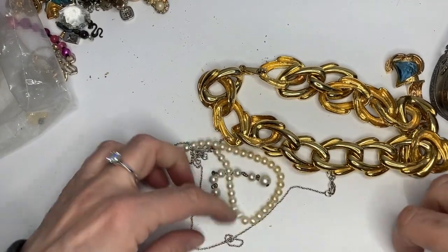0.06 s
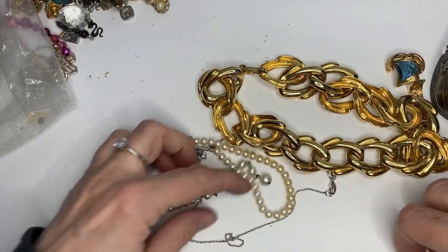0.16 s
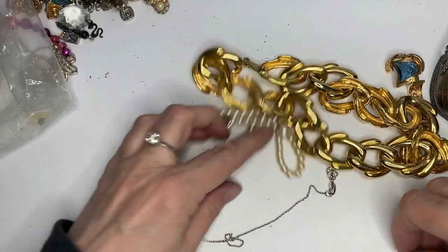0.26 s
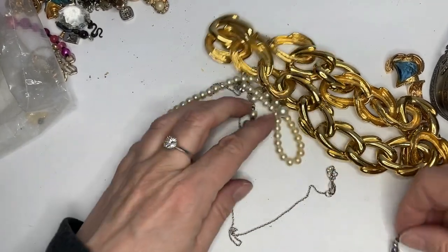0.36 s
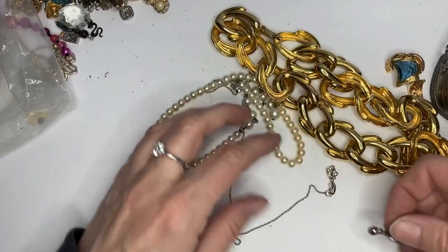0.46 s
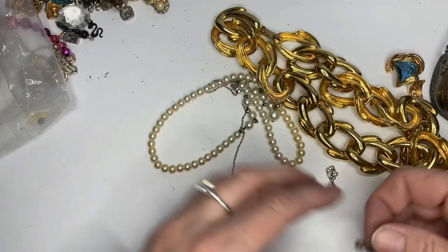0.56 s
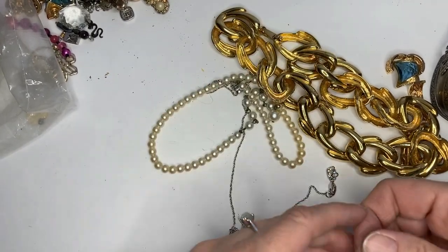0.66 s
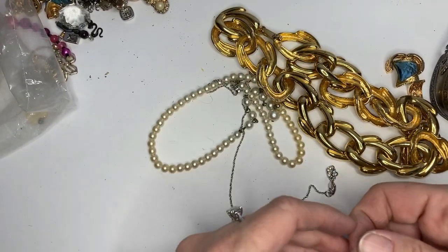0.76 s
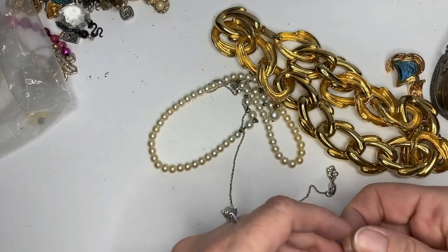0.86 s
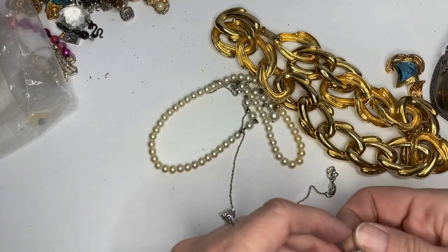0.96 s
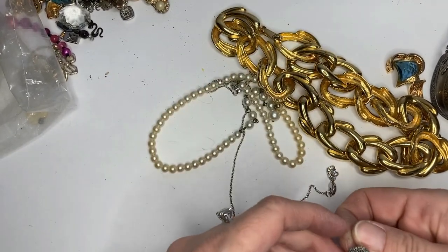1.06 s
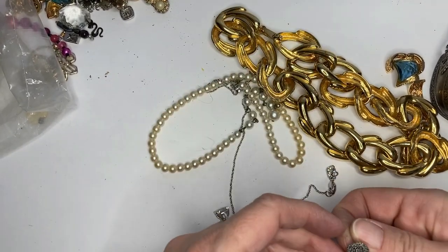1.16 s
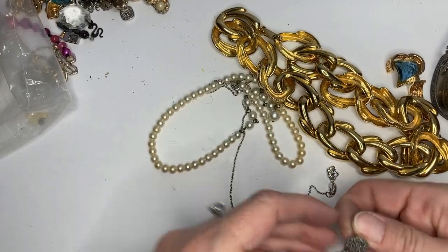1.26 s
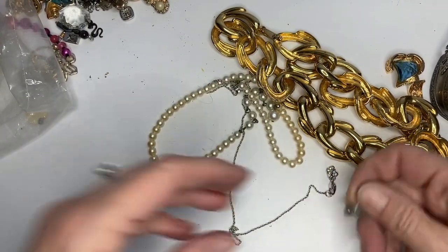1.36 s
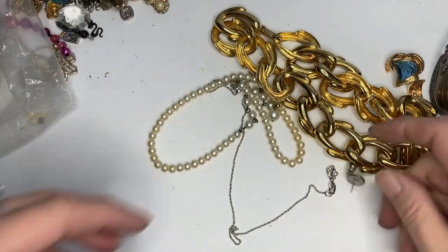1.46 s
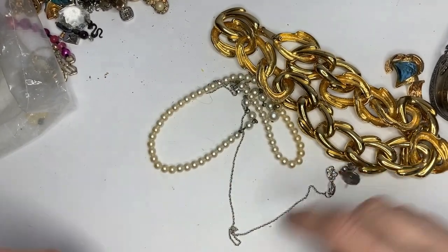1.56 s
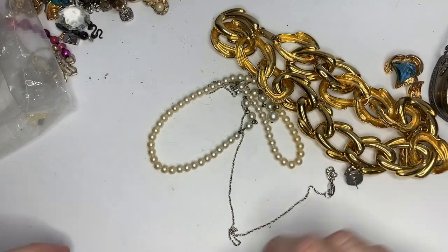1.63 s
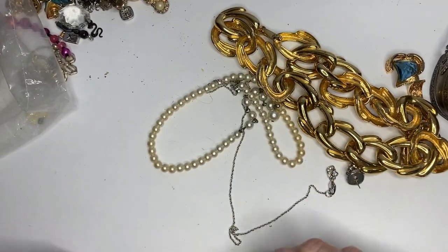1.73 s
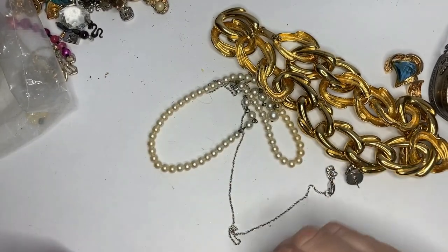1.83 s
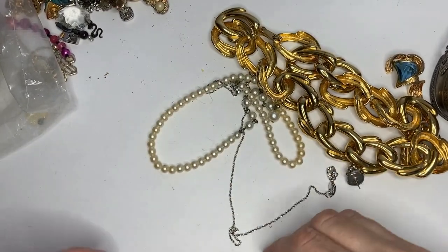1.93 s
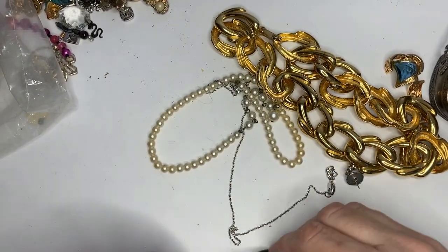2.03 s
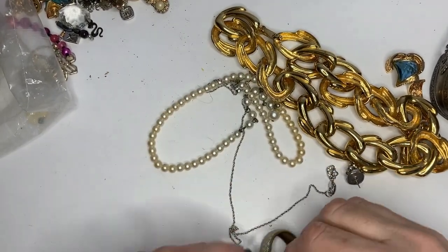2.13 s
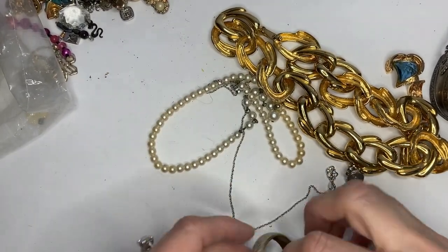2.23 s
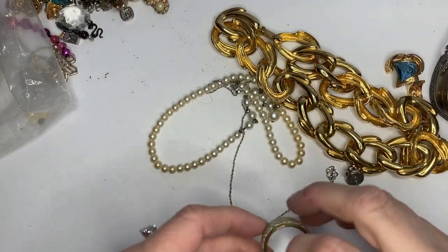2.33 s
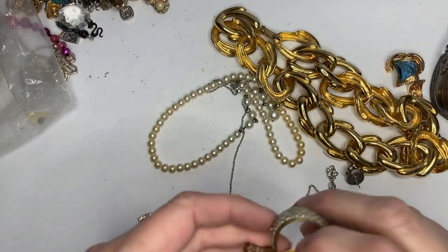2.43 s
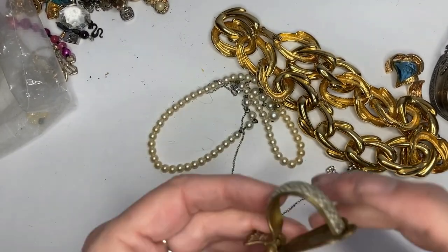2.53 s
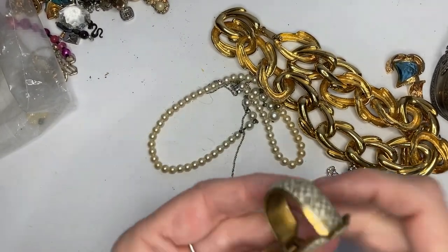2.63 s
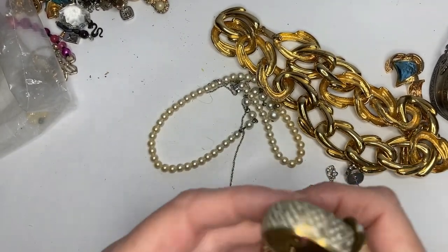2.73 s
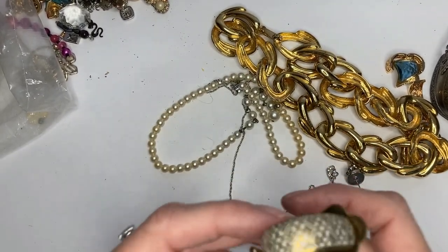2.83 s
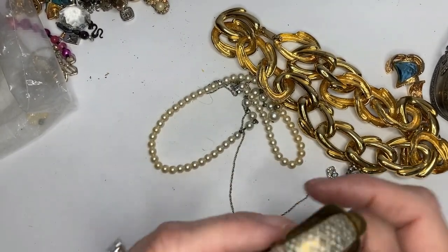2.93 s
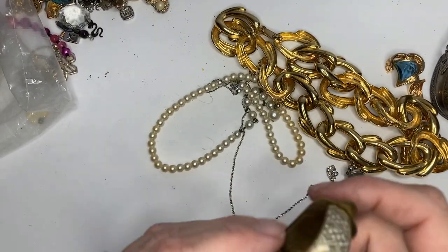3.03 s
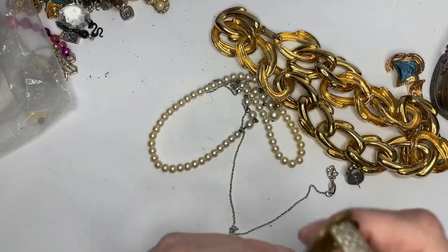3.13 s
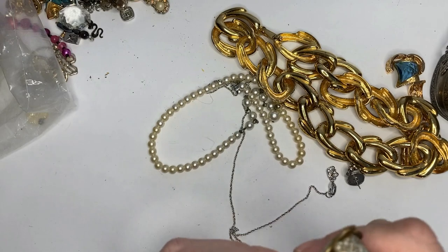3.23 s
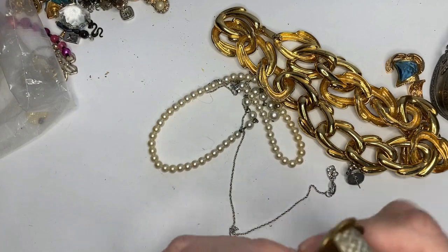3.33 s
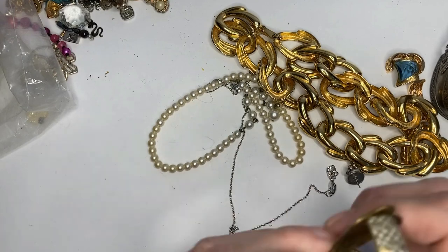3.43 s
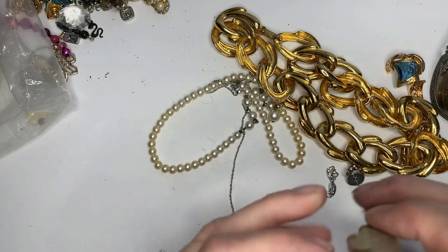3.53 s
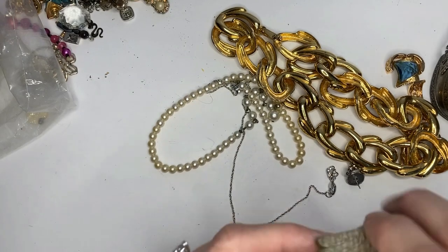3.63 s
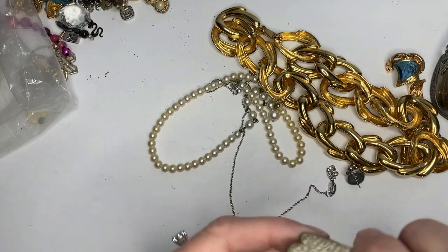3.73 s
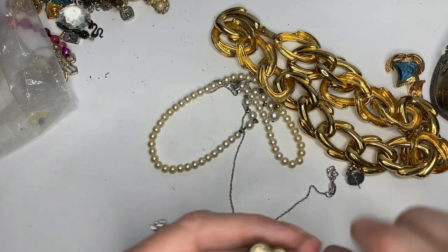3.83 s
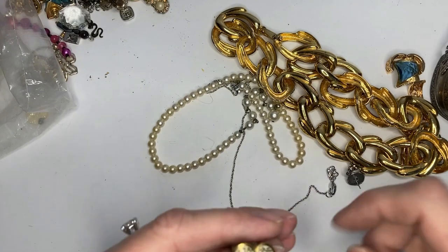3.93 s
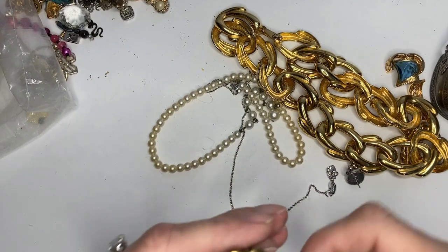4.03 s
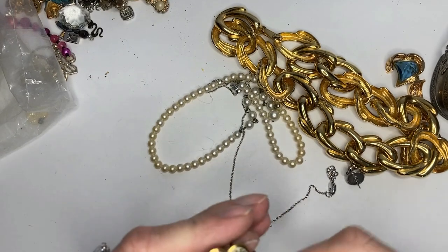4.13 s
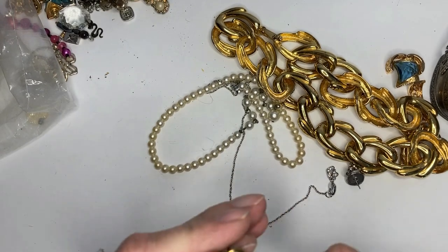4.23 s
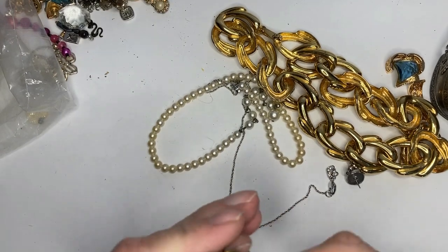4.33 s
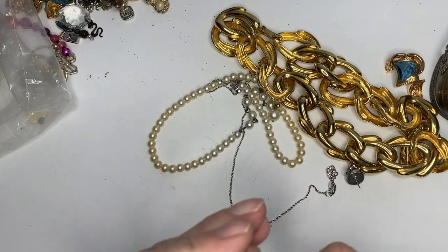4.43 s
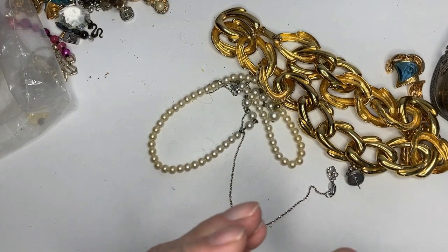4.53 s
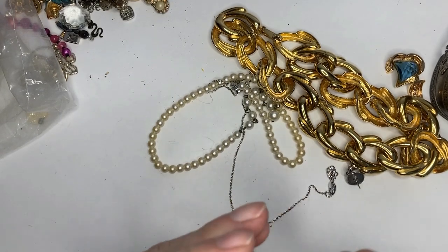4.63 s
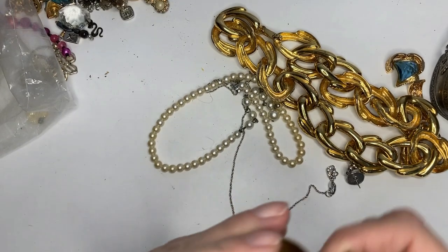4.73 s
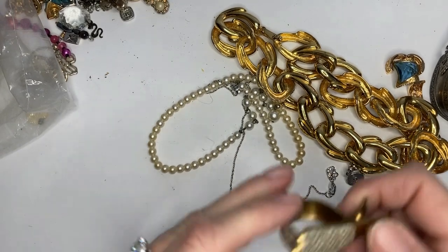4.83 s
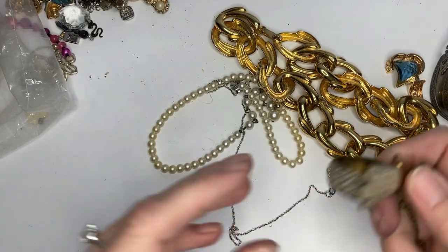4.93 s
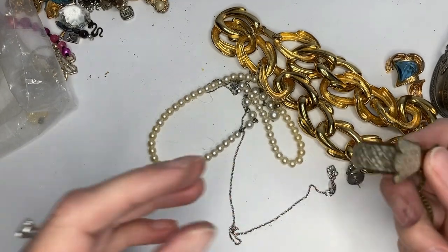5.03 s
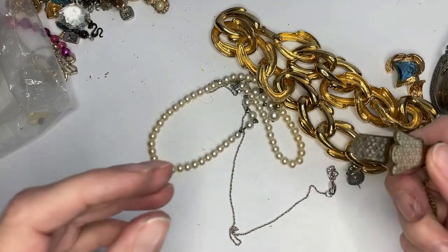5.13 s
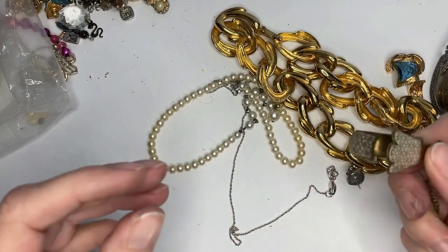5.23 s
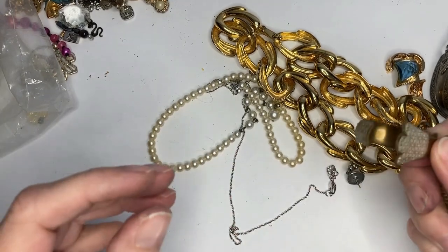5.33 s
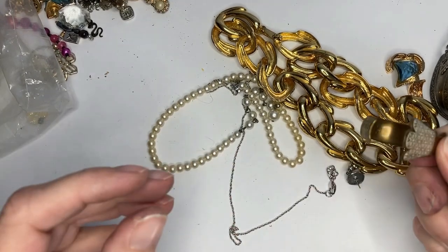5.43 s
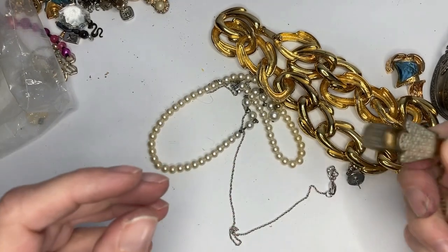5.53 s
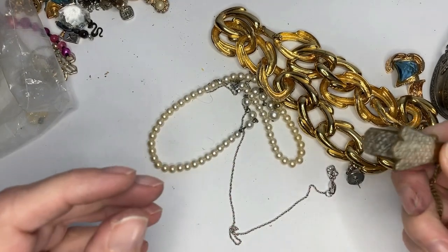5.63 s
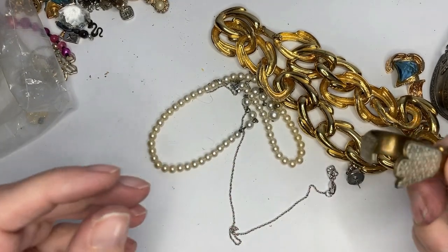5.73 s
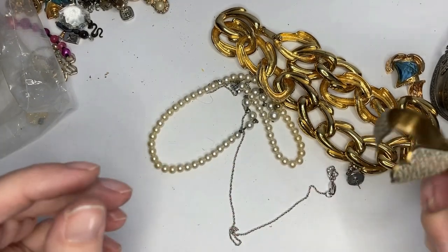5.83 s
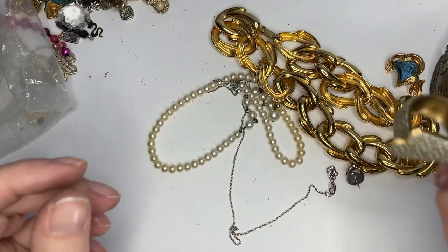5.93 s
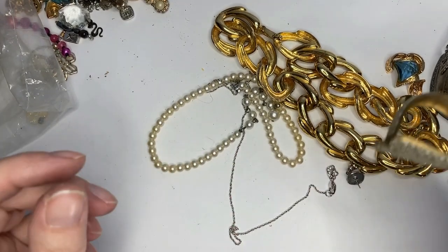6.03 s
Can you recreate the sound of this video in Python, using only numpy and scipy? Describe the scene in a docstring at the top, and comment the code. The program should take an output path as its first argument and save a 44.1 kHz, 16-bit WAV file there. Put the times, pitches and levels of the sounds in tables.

```python
"""Jewellery is sorted by hand on a table, close to a pair of microphone ports.
First pearls and a heavy chain are pushed aside: random tiny hits make the scrape and set the links ringing.
Then a small charm drops in dry ticks and thuds, and a metal bracelet is picked up with ringing knocks.
Its hinge ticks and grinds in short damped rings, and at last its clasp snaps shut.
Throughout, a motor in the building throbs as a sum of drifting overtones, over soft noise of the air."""
import sys
import numpy as np
from scipy import signal
from scipy.fft import rfft, irfft, next_fast_len
from scipy.io import wavfile
from scipy.ndimage import map_coordinates

SR = 44100
rng = np.random.default_rng(int(sys.argv[2]) if len(sys.argv) > 2 else 0)


def transcribe(u):
    """Save the signal u as a 16-bit wav file named by the first command-line argument.

    u: samples, shape (n,) or (channels, n), limited to [-1, 1]; the rate is SR.
    q: integer samples, one column per channel.
    """
    v = np.clip(np.atleast_2d(u).T, -1, 1)
    q = np.round(v * 32767).astype(np.int16)
    wavfile.write(sys.argv[1], SR, q)


N = 267863
TIME = np.arange(N) / SR  # s, the whole scene
AGE = np.arange(SR // 4) / SR  # s, since one hit began

# how a chain link rings: f/Hz, relative level/dB, time to fall by 60 dB (t60)/s
LINK = [(4515, -8.5, .06), (8143, -14, .03), (8659, -9, .08), (10082, -8, .09), (10859, -6, .085),
        (11968, -2, .04), (13201, -2, .07), (14592, -12, .09), (14859, -7, .06)]
# tone colour of small hard contacts: f/Hz, relative level/dB
TICK = [(300, -45.5), (1500, -15.5), (2900, -23.5), (4300, 0), (5400, -13), (8000, -6), (10000, -4),
        (12000, -11), (14000, -13.5), (16500, -9.5)]
# how fast a movement dies away when the hand stops
SETTLE_DB_PER_S = 618


def amp(db):
    """Turn decibels into a gain."""
    return 10 ** (np.asarray(db) / 20)


def unit(x):
    """Scale to an average strength (rms) of 1."""
    return x / np.sqrt(np.mean(x ** 2) + 1e-20)


def along(points, hz):
    """Read a curve of (Hz, value) points on a logarithmic pitch axis."""
    f, v = np.transpose(points)
    return np.interp(np.log(hz + 1), np.log(f + 1), v)


def wobble(rate):
    """Draw a smooth random curve with this many knots a second."""
    return map_coordinates(rng.standard_normal(400), [TIME * rate + 2], mode="mirror")


def filtered(x, response):
    """Change the strength or phase of each frequency in x."""
    m = next_fast_len(N + SR // 2)
    spectrum = rfft(x, m) * response(np.fft.rfftfreq(m, 1 / SR))
    return irfft(spectrum, m)[..., :N]


def coloured(x, spectrum):
    """Give x a tone colour; white input keeps its power."""
    return filtered(x, lambda hz: unit(amp(along(spectrum, hz))))


def add(track, s, sound):
    """Mix a sound into a track at time s."""
    part = track[max(round(s * SR), 0):][:len(sound)]
    part += sound[:len(part)]


def dying(t60):
    """Fade steadily, by 60 dB in t60 seconds."""
    return amp(-60 * AGE / max(t60, .001))


def blow(sound):
    """Scale a hit to rms 1 over its first two milliseconds."""
    return sound / np.sqrt(np.mean(sound[:SR // 500] ** 2) + 1e-20)


def contacts(rate, spread_db):
    """Scatter tiny impacts of uneven size at random, about rate a second, rms 1."""
    happens = rng.random(N) < rate / SR
    signs = rng.choice([-1, 1], N)
    sizes = amp(spread_db * np.clip(rng.standard_normal(N), -2, 2))
    return unit(happens * signs * sizes)


def strike(modes, crack_db, crack_t60, detune=0, rise_s=.0002):
    """Make one blow: every mode rings at a new strength, over the crack of the contact."""
    strengths = amp(2.5 * rng.standard_normal(len(modes)))
    pitches = np.exp(detune * rng.standard_normal(len(modes)))
    ring = np.zeros(len(AGE))
    for strength, pitch, (hz, db, t60) in zip(strengths, pitches, modes):
        tone = np.sin(2 * np.pi * (pitch * hz * AGE + rng.random()))
        ring += strength * amp(db) * dying(t60) * tone
    # subtracting nearby samples thins the bass of the noise
    crack = np.convolve(rng.standard_normal(len(AGE)), [1, 0, -1], "same") * dying(crack_t60)
    rise = 1 - np.exp(-AGE / rise_s)
    return blow(rise * (blow(ring) + amp(crack_db) * blow(crack)))


def rattle(modes, gain, rate, detune, count=12):
    """Ring many like pieces, each a little off in its pitches and struck at its own moments."""
    out = np.zeros(N)
    moving = np.flatnonzero(gain > gain.max() / 1000)
    span = slice(moving[0], moving[-1] + 1)
    for _ in range(count):
        ring = np.zeros(len(AGE))
        for hz, db, t60 in modes:
            piece_hz = hz * np.exp(detune * rng.normal())
            ring += amp(db) * dying(t60) * np.sin(2 * np.pi * (piece_hz * AGE + rng.random()))
        hits = gain * contacts(rate / count, spread_db=4)
        ringing = signal.oaconvolve(hits[span], ring / np.linalg.norm(ring))
        add(out, span.start / SR, ringing)
    return out / np.sqrt(count)


def stroke(start, length, fade_db_per_s, release_db_per_s):
    """Shape one movement: a quick rise up to its start, a steady fade or growth, then the release."""
    attack_s = 0.0036
    age = np.maximum(TIME - start, 0)
    rise = np.clip((TIME - start) / attack_s + 1, 0, 1) ** 2
    fade_db = -fade_db_per_s * np.minimum(age, length)
    release_db = -release_db_per_s * np.maximum(age - length, 0)
    return rise * amp(fade_db + release_db)


def swells(rows):
    """Shape soft movements that come and go smoothly."""
    return sum(amp(db) * np.exp(-((TIME - s) / half) ** 2) for s, half, db in rows)


def low_cut(x, cut_hz):
    """Weaken the bass: a body radiates little below its lowest mode."""
    return signal.sosfilt(signal.butter(4, cut_hz, "high", fs=SR, output="sos"), x)


def chain():
    """Heavy links jostle and clink, over the clatter of pearls and the thin ring of light links."""
    # the chain is shoved: start t/s, length/s, relative level/dB
    shoves = [(0.023, 0.25, -41.5), (0.264, 0.071, -28), (0.309, 0.095, -22), (0.434, 0.0091, -27)]
    # link strikes link: t/s, relative level/dB
    clinks = [(.251, -18), (0.276, -12.5), (0.3137, -0.5), (.319, -3), (0.3482, -14.5), (.366, -11),
              (.387, -9), (.404, -8.5), (.413, -18.5), (.441, -18)]
    # thin ringing of the light links: f/Hz, relative level/dB, t60/s
    light_links = [(2750, -19, .2), (3430, -7.5, 0.24), (3810, 4, 0.19), (4231, -15.5, .2)]
    fade_db_per_s = 47.5
    strokes = [amp(db) * stroke(s, length, fade_db_per_s, SETTLE_DB_PER_S) for s, length, db in shoves]
    jostle = np.max(strokes, axis=0)
    links = rattle(LINK, jostle, rate=190, detune=.025)
    pearls = coloured(jostle * contacts(rate=350, spread_db=5), TICK)
    thin = np.zeros(N)
    for hz, db, t60 in light_links:
        thin += amp(db) * rattle([(hz, 0, t60)], jostle, rate=80, detune=.003, count=1)
    out = amp(1.5) * links + amp(-16.0) * pearls + amp(-23) * thin
    for s, db in clinks:
        clink = strike(LINK, crack_db=-7, crack_t60=.025, detune=.002)
        add(out, s, amp(db - 10.0) * clink)
    return out


def sliding():
    """Beads and links catch and skip over the grain of the table, which drums beneath them."""
    # pieces are pushed over the table: start t/s, length/s, relative scrape level/dB,
    # scrape fade/(dB per s; negative grows), relative drumming level/dB
    pushes = [(0.008, 0.37, -56, -17.5, -49.5), (0.122, 0.036, -46.5, 43, -43.5),
              (0.241, 0.2, -38.5, 61.5, -37.5), (0.542, 0.012, -57.5, 29, -63), (1.469, 0.43, -55, 43, -64),
              (1.748, 0.32, -43, 39, -44), (2.14, 0.14, -55.5, 31, -67.5), (2.367, 0.18, -54, -13, -60)]
    # fingertips brush over beads and metal: middle t/s, half length/s, relative level/dB
    brushes = [(.67, 0.11, -71.5), (1.46, 0.071, -74.5), (2.69, 0.15, -69.5), (3.17, 0.069, -78),
               (5.04, 0.2, -80.5)]
    # tone colour of the scrape: f/Hz, relative level/dB
    scrape_colour = [(200, -32.5), (700, 0), (1500, -3), (2700, -8.5), (3900, 2), (5200, -10.5),
                     (7000, 1.5), (10000, 1), (13000, -7.5), (16000, -5.5)]
    # tone colour of the drumming table: f/Hz, relative level/dB
    table_colour = [(60, -16), (150, -3.5), (300, 1.5), (480, -4), (600, -10.5), (900, -15.5), (1500, -33),
                    (3000, -33)]
    release_db_per_s, drum_fade_db_per_s = 205.5, 18.5
    handling_db = -85.5  # relative level: the hands are never quite still
    rub = swells(brushes) + amp(handling_db)
    weight = np.zeros(N)
    for s, length, scrape_db, fade, drum_db in pushes:
        rub = np.maximum(rub, amp(scrape_db) * stroke(s, length, fade, release_db_per_s))
        press = amp(drum_db) * stroke(s, length, drum_fade_db_per_s, SETTLE_DB_PER_S)
        weight = np.maximum(weight, press)
    catching = amp(3 * wobble(60))
    scrape = rub * unit(catching * contacts(rate=2000, spread_db=5))
    drum = weight * contacts(rate=400, spread_db=4.5)
    return amp(7.5) * coloured(scrape, scrape_colour) + amp(0.5) * coloured(drum, table_colour)


def ticks():
    """Small hard parts meet with a crack, bounce once and hardly ring."""
    # dry contacts of chain, charm, beads and bracelet, including the crack of the chain's
    # hardest clink: t/s, relative level/dB
    taps = [(0.014, -26.5), (0.034, -25.5), (0.314, -5), (0.553, -25.5), (1.471, -23), (1.4773, -10.5),
            (1.4875, -9.5), (1.4886, -14.5), (1.5162, -11), (1.531, -22), (1.723, -29.5), (1.758, -16.5),
            (1.773, -21), (1.7946, -13.5), (1.895, -25.5), (1.972, -21.5), (2.2098, -15), (2.373, -27),
            (2.415, -17.5), (2.422, -20), (5.984, -32)]
    t60_s, bounce_s, bounce_db = 0.011, 0.0077, -22
    out = np.zeros(N)
    for s, db in taps:
        for delay, softer_db in [(0, 0), (bounce_s, bounce_db)]:
            crack = blow(rng.standard_normal(len(AGE)) * dying(t60_s))
            add(out, s + delay, amp(db + softer_db - 8) * crack)
    return coloured(out, TICK)


def thuds():
    """A blow wakes a cluster of damped table modes, briefer when higher; low blows make the board boom."""
    # blows on the table: t/s, relative level/dB, f/Hz
    knocks = [(.32, -24, 350), (0.355, -26.5, 440), (.369, -30, 650), (0.449, -37, 338),
              (1.4905, -21, 1650), (1.4915, -26, 887), (1.492, -25, 438), (1.757, -28, 180.6),
              (1.82, -29, 206), (1.858, -31, 252), (1.917, -33, 930), (1.923, -25.5, 197),
              (1.949, -28, 435), (2.004, -23.5, 260), (2.387, -40, 1084)]
    # the table board booms: f/Hz, relative level/dB, t60/s
    board = [(172, -5, .09), (281.6, 3.5, 0.13), (409.7, -9.5, 0.046)]
    spread_octaves, t60_at_400_hz_s, rise_cycles = .6, 0.02, 1
    # the boom builds up slowly, and mostly in modes near the pitch of the blow
    board_rise_s, board_reach_octaves = .004, .45
    out = np.zeros(N)
    octaves = spread_octaves * np.linspace(-1, 1, 9)
    weights = np.cos(octaves * np.pi / 2)
    for s, db, hz in knocks:
        pitches = hz * 2 ** (octaves + .08 * rng.standard_normal(len(octaves)))
        rings = [np.sin(2 * np.pi * f * AGE) * dying(t60_at_400_hz_s * (400 / f) ** .7) for f in pitches]
        knock = (weights * rng.choice([-1, 1], len(octaves))) @ np.array(rings)
        knock *= 1 - np.exp(-AGE * hz / rise_cycles)
        boom = np.zeros(len(AGE))
        for f, level, t60 in board:
            nearness = np.exp(-(np.log2(f / hz) / board_reach_octaves) ** 2)
            boom += amp(level) * nearness * np.sin(2 * np.pi * f * AGE) * dying(t60)
        boom *= 1 - np.exp(-AGE / board_rise_s)
        add(out, s, amp(db + 4.0) * (knock / np.abs(knock).max() + boom))
    return out


def bracelet():
    """The lifted shell knocks on links, each contact waking some modes most; its dragged rim chatters."""
    # the shell knocks: t/s, relative level/dB, centre f/Hz of the modes that the contact wakes
    clanks = [(1.8142, -7.5, 7300), (1.915, -17, 14000), (1.9195, -14.5, 9600), (2.0122, -19.5, 13000),
              (2.0159, -14, 12100)]
    # how the shell rings before that choice of modes: f/Hz, relative level/dB, t60/s
    shell_modes = [(4285, -12, .1), (4597, -5, .09), (5620, -2, .11), (5879, -1, .07), (6438, -2, .1),
                   (7066, -2, .1), (7790, -10, .07), (8895, -7, .05), (9134, -2, .11), (10648, -4, .06),
                   (10888, 1, .07), (11320, -6, .07), (13180, -3, .055), (14145, -6, .08)]
    # the rim is dragged: middle t/s, half length/s (its sign does not matter), level/dB
    drags = [(2.423, -0.02, -40)]
    # how the rim rings: f/Hz, relative level/dB, t60/s
    rim = [(3410, -7, 0.025), (4000, 1, 0.019)]
    focus_db = 13.5  # modes are this much weaker for each octave from the centre
    rebound_s, rebound_db = 0.0058, -7  # a second contact follows at once
    crack_db, crack_t60_s = -5, .025
    struck_link_db = -9.5  # the link that the shell meets rings too
    out = np.zeros(N)
    for s, db, centre_hz in clanks:
        modes = [(hz, level - focus_db * abs(np.log2(hz / centre_hz)), t60) for hz, level, t60 in shell_modes]
        for delay, softer_db in [(0, 0), (rebound_s, rebound_db)]:
            shell = strike(modes, crack_db, crack_t60_s)
            link = strike(LINK, crack_db, crack_t60_s, detune=.07)
            add(out, s + delay, amp(db + softer_db - 5) * (shell + amp(struck_link_db) * link))
    return out + rattle(rim, swells(drags), rate=350, detune=.06, count=6)


def hinge():
    """Damped by the hand, the hinge ticks and grinds; each catch rings one part more and slips again."""
    # the hinge catches and lets go: t/s, relative level/dB, f/Hz of the part that catches
    catches = [(2.6592, -33.5, 13400), (2.818, -35, 13900), (2.8347, -26, 3920), (2.935, -40, 8800),
               (2.959, -31.5, 4020), (3.1048, -38.5, 14000), (3.405, -41, 5190), (3.561, -30.5, 14700),
               (3.7893, -27, 4170), (3.8103, -29, 4400), (3.8394, -32.5, 9050), (3.881, -32, 8700),
               (3.93, -26, 8970), (4.0567, -20.5, 7700), (4.1938, -31, 10060), (4.224, -39, 14000),
               (4.2764, -26, 5480), (4.389, -26, 14300), (4.468, -35, 9400)]
    # the hinge grinds: middle t/s, half length/s, level/dB before the bass is cut
    grinds = [(3.577, 0.049, -52), (3.763, 0.054, -52.5), (3.87, 0.038, -51.5), (4.088, 0.023, -48),
              (4.333, 0.097, -60.5), (4.386, 0.013, -41.5), (4.538, 0.018, -58)]
    # how the hinge rings: f/Hz, relative level/dB, t60/s
    hinge_modes = [(3030, -30.5, 0.075), (3900, -18.5, 0.023), (4390, -10, 0.014), (5400, 8, 0.0069),
                   (7700, -16.5, 0.033), (8290, -1.5, 0.028), (9510, 0.5, 0.034), (12670, 0, 0.021),
                   (14400, -3, 0.013)]
    part_db, part_t60_s = 5.5, 0.011  # the ring of the part that catches
    slip_s, slip_db = 0.015, -13.5  # typical delay and softer level of the second slip
    out = np.zeros(N)
    for s, db, hz in catches:
        modes = hinge_modes + [(hz, part_db, part_t60_s)]
        for delay, softer_db in [(0, 0), (slip_s * np.exp(.2 * rng.normal()), slip_db)]:
            catch = strike(modes, crack_db=-1, crack_t60=.009, detune=.015)
            add(out, s + delay, amp(db + softer_db - 9.0) * catch)
    for s, half, db in grinds:
        out += rattle(hinge_modes, swells([(s, half, db)]), rate=1000, detune=.06, count=6)
    return low_cut(out, cut_hz=3120)


def clasp():
    """The spring catch snaps home in one very short, bright ring."""
    # the clasp snaps shut: t/s, relative level/dB
    snap_event = (5.6116, -3.1)
    # how the clasp rings: f/Hz, relative level/dB, t60/s
    clasp_modes = [(4400, 3, 0.0086), (7740, 2.5, 0.011), (8460, 0.5, 0.011), (10750, 4.5, 0.014)]
    out = np.zeros(N)
    s, db = snap_event
    snap = strike(clasp_modes, crack_db=-1, crack_t60=.007)
    add(out, s, amp(db - 13.5) * snap)
    return out


def motor():
    """A motor throbs as it turns; its speed and level drift, and each overtone also wavers on its own."""
    # turning speed: t/s, speed/(turns per s)
    speed = [(0, 28.45), (.9, 28.8), (2.2, 28.48), (3.8, 29), (5.3, 28.68)]
    # slow drift: t/s, relative level/dB of the low overtones, of the middle one, of the upper ones
    drift_levels = [(0, -43, -51, -40.5), (1.7, -43, -47.5, -39.5), (2.45, -40.5, -45, -35.5),
                    (2.9, -44.5, -61, -38), (3.5, -39.5, -44, -36), (4.201, -53.5, -40, -44),
                    (4.7, -48, -46, -46), (5.7, -43.5, -52.5, -45.5)]
    # overtones: multiple of the turning speed, relative level/dB
    overtones = [(2, -6.5), (4, 2), (5, 8), (6, 6.5), (7, -2), (8, -1), (10, -5.5), (11, -17.5),
                 (14, -22.5)]
    middle_order, waver_db = 8, 3.5
    turns = np.cumsum(np.interp(TIME, *np.transpose(speed))) / SR
    s, *levels = np.transpose(drift_levels)
    low, middle, upper = [amp(np.interp(TIME, s, db)) for db in levels]
    hum = np.zeros(N)
    for order, db in overtones:
        k = round(order)
        drift = low if k < middle_order else middle if k == middle_order else upper
        level = drift * amp(db + waver_db * wobble(1.7))
        hum += level * np.cos(2 * np.pi * k * turns + .25 * wobble(1))
    return amp(-6.0) * hum


def air():
    """Low room noise, much alike at both ports in the bass and unrelated in the treble."""
    # tone colour of the noise: f/Hz, relative level/dB
    air_colour = [(20, -33.5), (55, 4), (130, 2), (260, -7), (450, -20), (900, -27), (2000, -46.5),
                  (5000, -53), (10000, -56), (16000, -67)]
    mid, side = coloured(rng.standard_normal((2, N)), air_colour)
    # the difference between the ports: f/Hz, gain/dB
    side = filtered(side, lambda hz: amp(along([(150, -16.0), (700, 3.0), (2000, 4.0)], hz)))
    return amp(-45) * np.array([mid + side, mid - side])


def room(x):
    """Echoes blur into a tail of fading noise for each port; the treble dies first."""
    # how long the room rings: f/Hz, t60/s
    room_t60 = [(200, 0.23), (2000, 0.13), (12000, 0.035)]
    hz, t, z = signal.stft(rng.standard_normal((2, SR // 2)), SR, nperseg=256)
    fade = amp(-60 * t / along(room_t60, hz)[:, None])
    tail = signal.istft(z * fade, SR, nperseg=256)[1]
    tail = tail * (1 - np.exp(-np.arange(tail.shape[1]) / SR / 0.00032))  # soft start
    return signal.fftconvolve(x[None], tail / np.linalg.norm(tail[0]), axes=1)[:, :N]


def ports(x):
    """Sound from the table reaches the left port a moment before the right."""
    # how far the left port is ahead: f/Hz, phase/radians
    lead = [(0, 0), (2200, .6), (4300, 1.9), (5700, 3.2), (8300, 6.1), (11800, 9.4), (16500, 14)]
    left = filtered(x, lambda hz: np.exp(.5j * np.interp(hz, *np.transpose(lead))))
    right = filtered(x, lambda hz: np.exp(-.5j * np.interp(hz, *np.transpose(lead))))
    return np.array([amp(-0.63) * left, right])


def scene():
    """Mix the pieces on the table and in the hand, their room, and the hum behind them."""
    metal = chain() + bracelet() + ticks()
    held = hinge() + clasp()
    slides, blows = sliding(), thuds()
    # the table's bass reaches the ports directly; its middle range spreads through the room
    spread = filtered(slides + amp(1.5) * blows,
                      lambda hz: amp(along([(250, -17.0), (900, -4.0), (6000, -4.0)], hz)))
    direct = ports(metal + held + slides + blows)
    echoes = room(amp(-13.0) * metal + amp(-11.5) * held + spread)
    return direct + echoes + motor() + air()


def record(dry):
    """The recorder clips at full scale and keeps almost nothing above its band limit."""
    top_hz = 15900
    return filtered(np.clip(dry, -1, 1), lambda hz: 1 / np.sqrt(1 + (hz / top_hz) ** 160))


dry = scene()
out = record(dry)
transcribe(out)
```